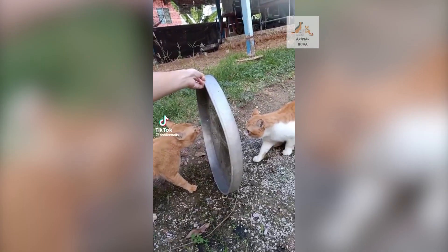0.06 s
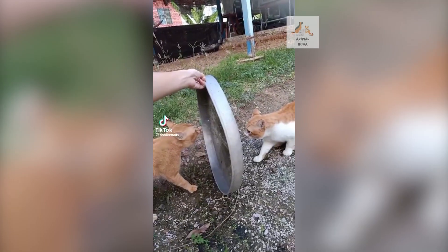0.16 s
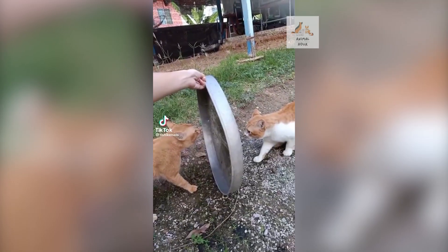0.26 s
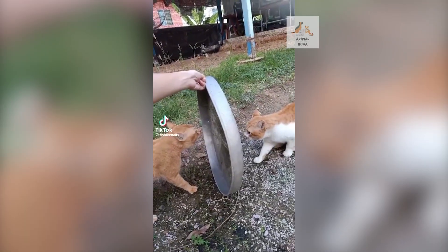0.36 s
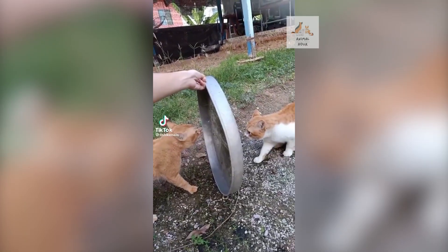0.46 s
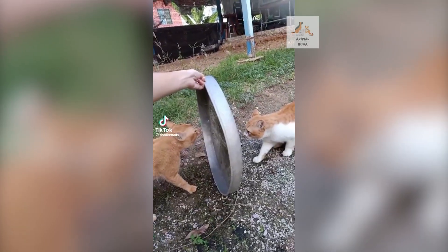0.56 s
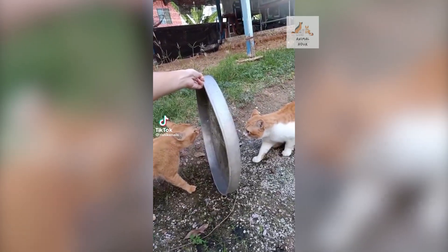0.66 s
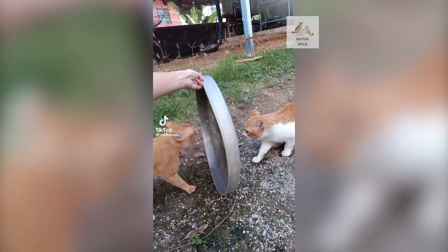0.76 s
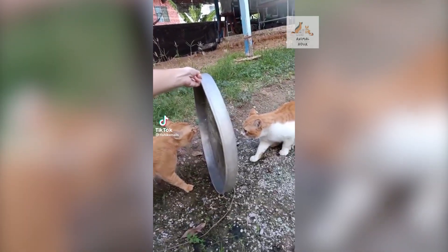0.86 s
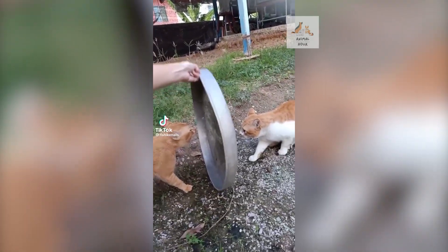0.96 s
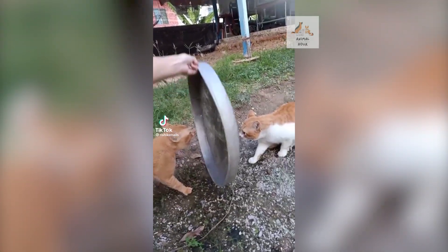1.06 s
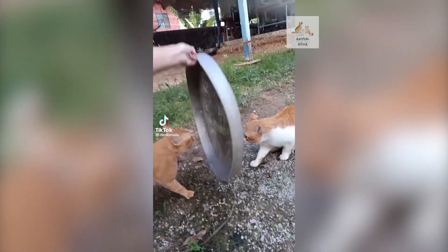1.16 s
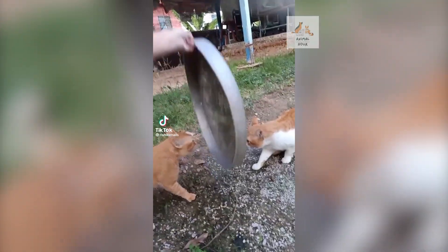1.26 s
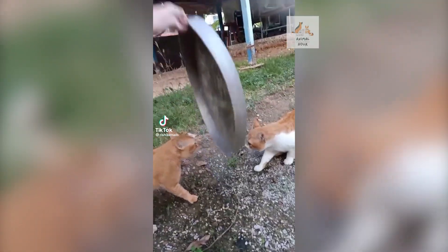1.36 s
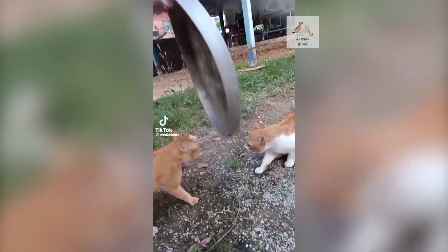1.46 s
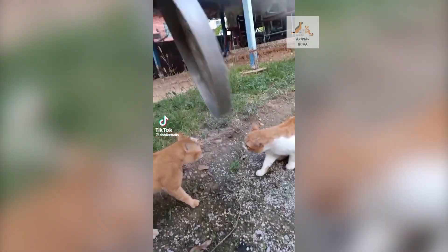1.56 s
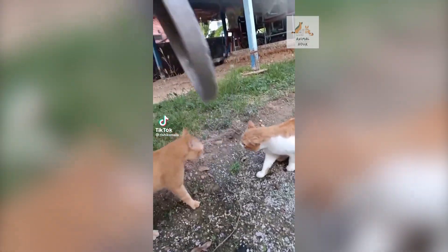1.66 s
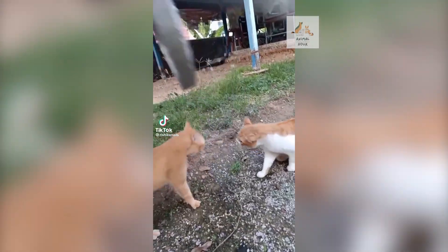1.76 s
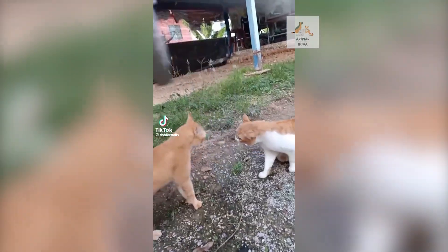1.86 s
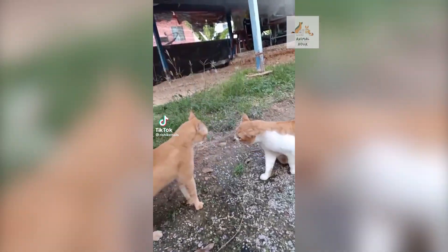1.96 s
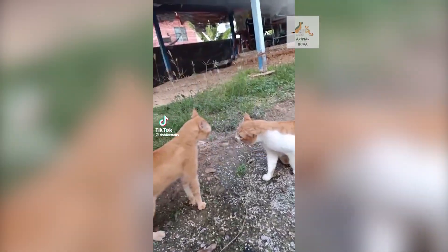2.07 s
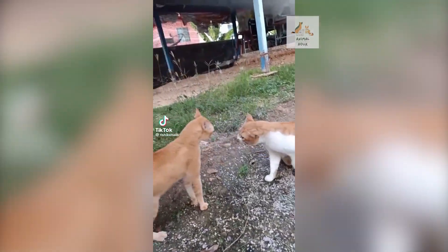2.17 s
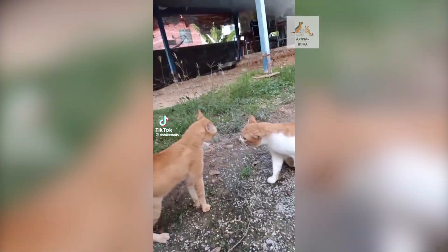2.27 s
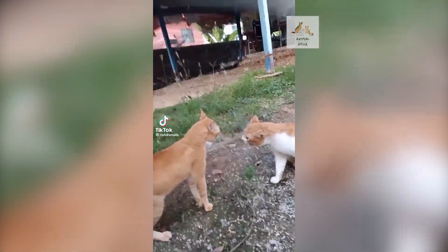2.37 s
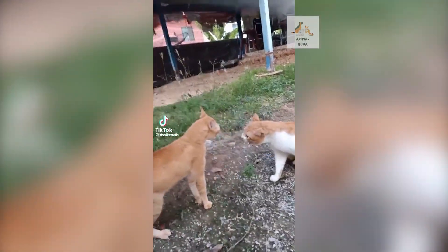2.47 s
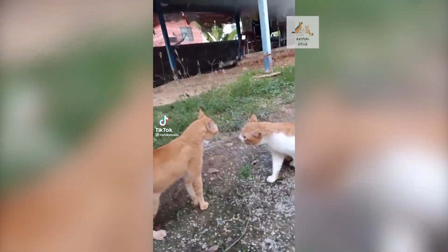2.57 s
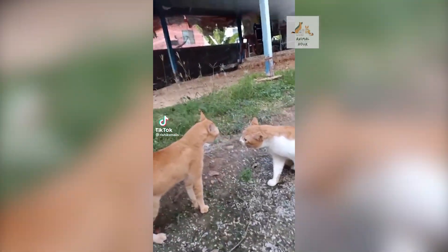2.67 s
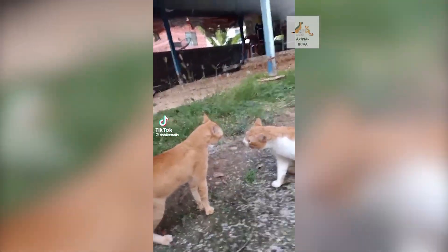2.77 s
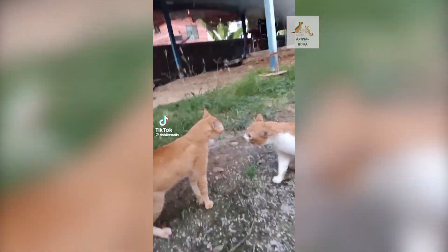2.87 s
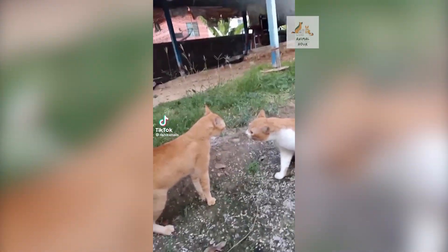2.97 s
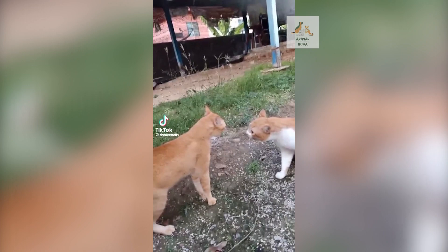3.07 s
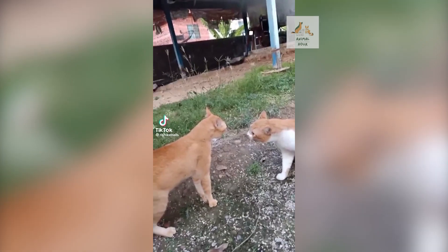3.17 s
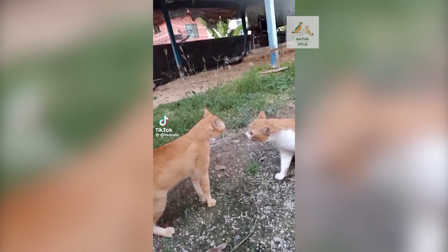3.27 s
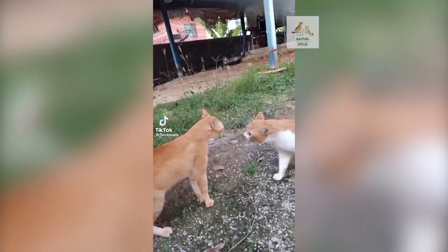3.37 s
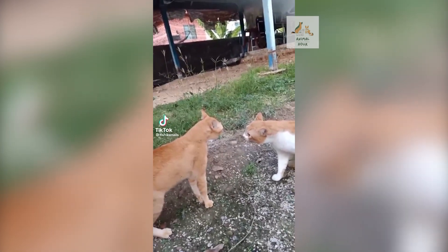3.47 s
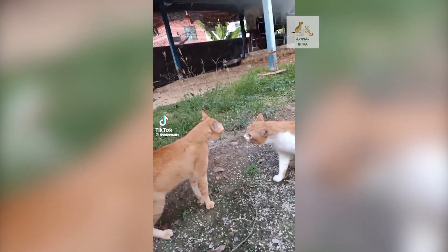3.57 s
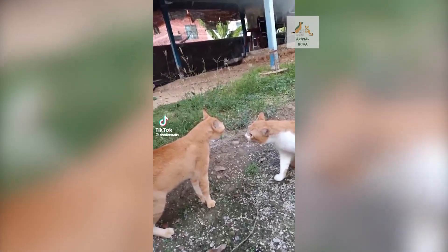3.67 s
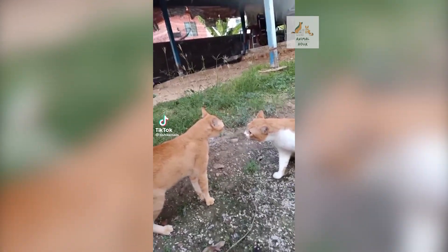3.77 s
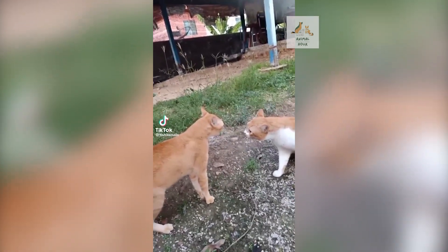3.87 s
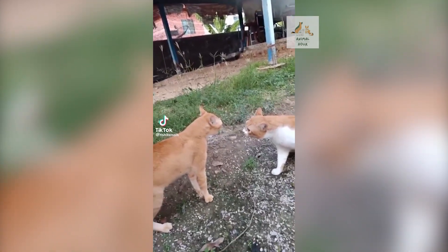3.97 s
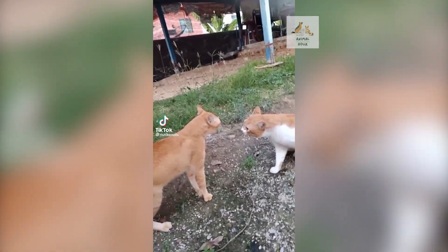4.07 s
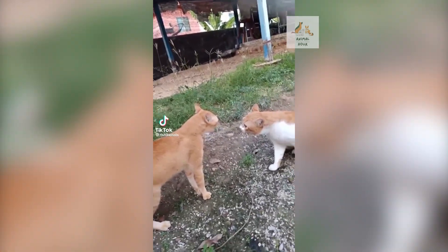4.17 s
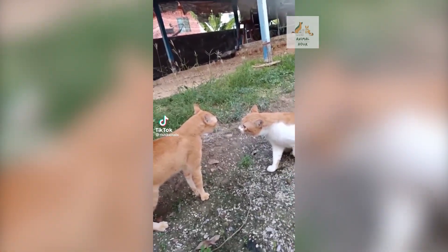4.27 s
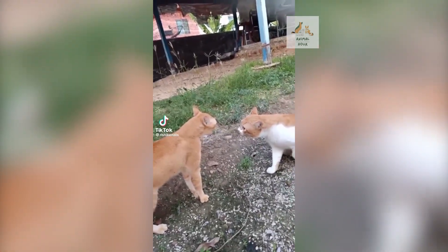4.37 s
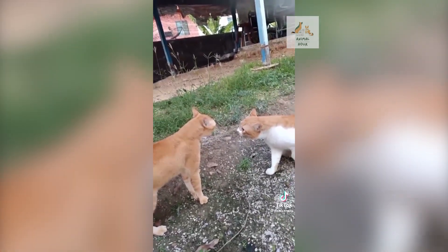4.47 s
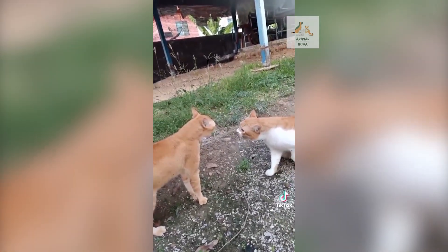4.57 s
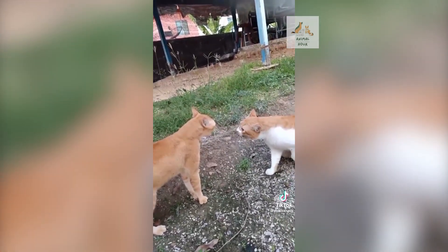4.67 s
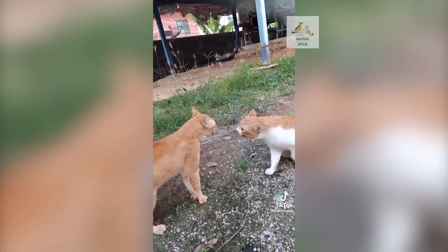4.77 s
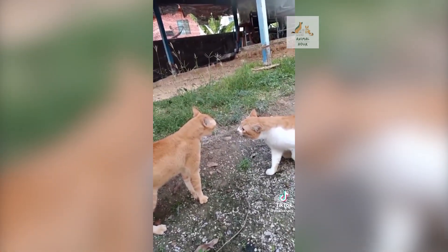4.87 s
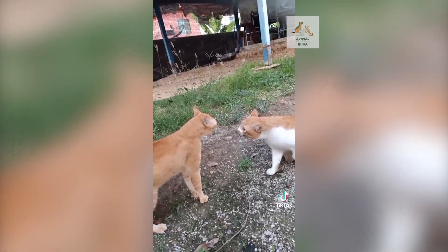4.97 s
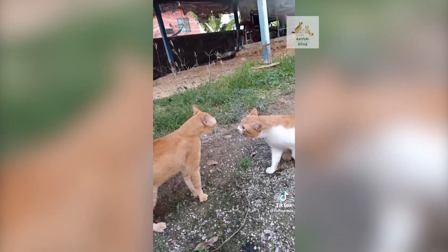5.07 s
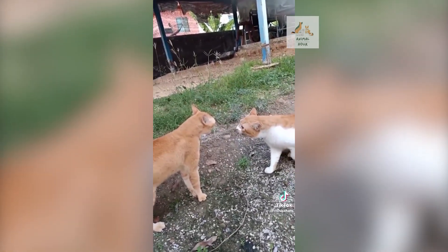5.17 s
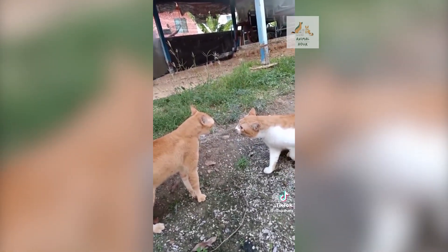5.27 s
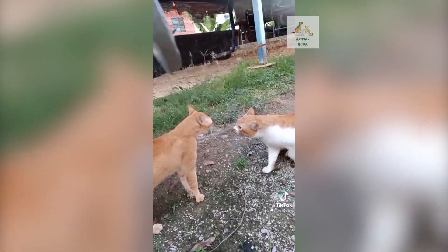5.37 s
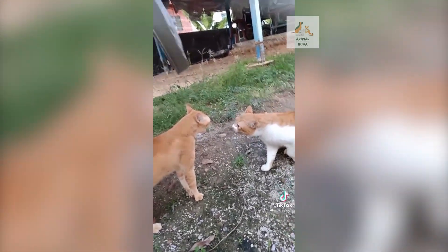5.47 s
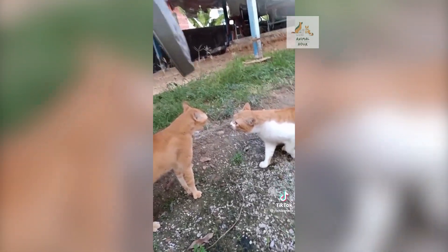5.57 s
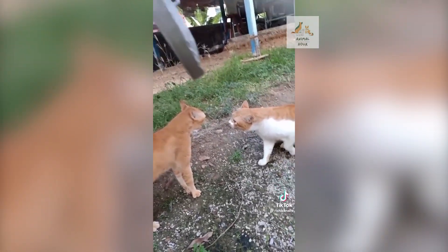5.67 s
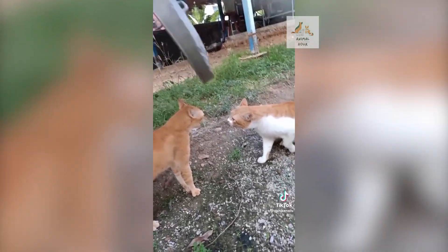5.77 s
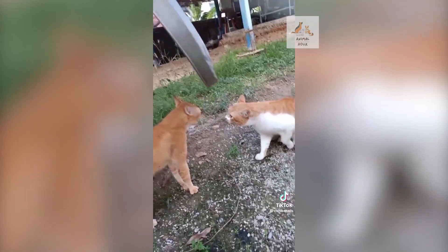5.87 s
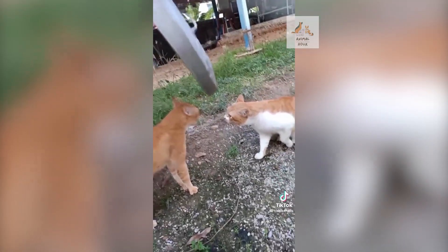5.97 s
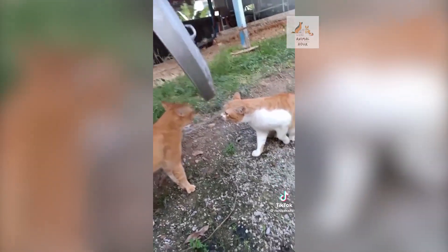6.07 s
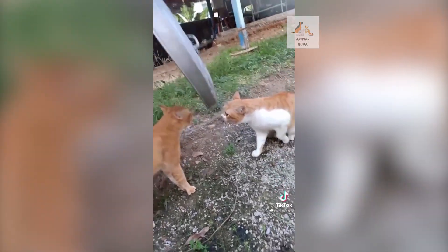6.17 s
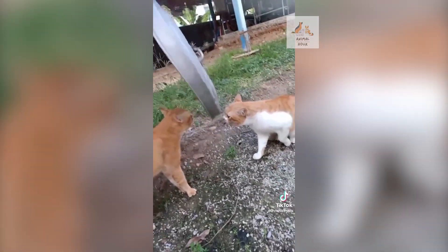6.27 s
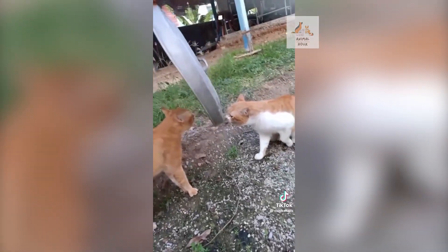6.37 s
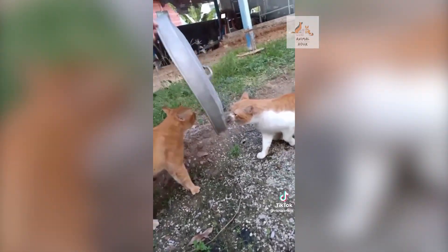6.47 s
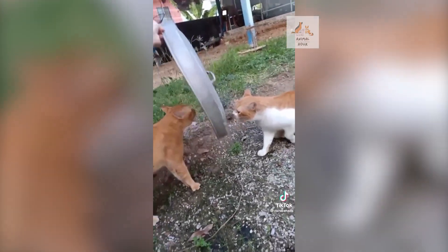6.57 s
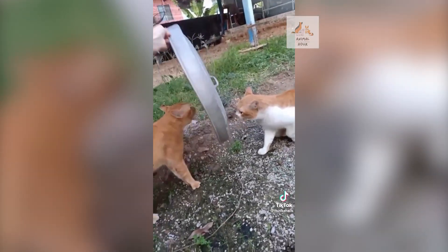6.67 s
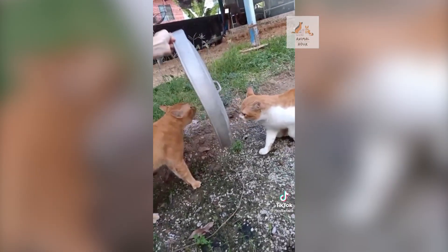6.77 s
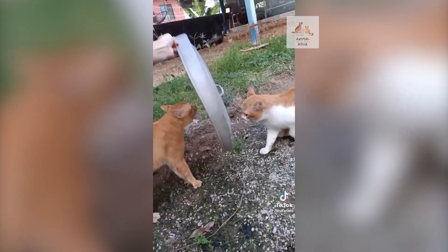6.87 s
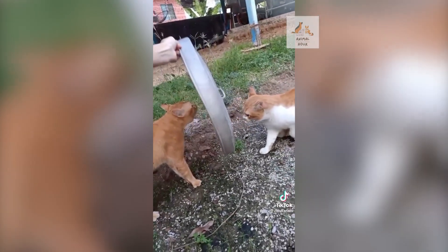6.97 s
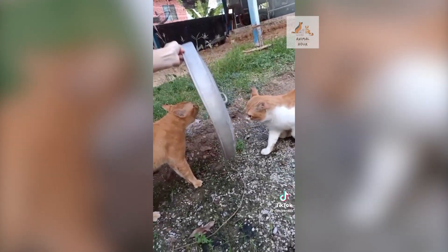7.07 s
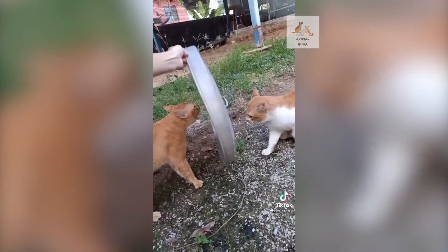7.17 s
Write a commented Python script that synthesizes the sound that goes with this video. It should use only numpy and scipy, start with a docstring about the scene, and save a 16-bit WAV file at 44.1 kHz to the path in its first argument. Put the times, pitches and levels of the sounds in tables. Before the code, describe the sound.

Close outdoor capture of two cats threatening each other. Quiet low moans lead to a sudden piercing scream about two seconds in, rough at its peak, then gliding down in pitch. The softer cat arches a moan beneath it. A second, cleaner yowl follows, held and wavering, closing down before a final short rise and fall. Sparse small knocks and scuffs sit over faint low outdoor noise and handling rumble, with short yard reflections.

```python
"""A loud cat moans, climbs to a harsh scream, then holds a long yowl that swells once more at the end.
A softer cat answers underneath with lower moans, the first with a little nasal hiss.
Each voice is a pulse train with breath noise, shaped by moving throat and mouth resonances.
Light ticks, knocks and scuffs are short noise bursts; the quiet outdoor bed and rumble are coloured noise.
Short echoes and scattered reflections place the cats and ticks in a yard, close to a wall."""
import sys
import numpy as np
from scipy import signal
from scipy.fft import rfft, irfft, next_fast_len
from scipy.io import wavfile

SR = 44100
rng = np.random.default_rng(int(sys.argv[2]) if len(sys.argv) > 2 else 0)


def store_wav(level_fs):
    """Save 16-bit WAV to argv[1]."""
    pcm = np.round(np.clip(np.atleast_2d(level_fs), -1, 1) * 32767)
    wavfile.write(sys.argv[1], SR, pcm.T.astype(np.int16))


N = 318843
TIME = np.arange(N) / SR
CUTOFF_HZ = 14500
STFT = dict(nperseg=1024, noverlap=896)

# Irregularity of the vocal folds (0-1): nearly clean in mid-call, creaky as a call starts and stops
STEADY_ROUGH, START_ROUGH = .012, 0.063
START_SETTLE_S, STOP_CREAK_S = .08, .04
# A cat presses harder while its pitch climbs, and the throat sags as a call runs out
PRESS_DB_PER_OCTAVE, FULL_PRESS_OCTAVES_PER_S, SAG_S = 0.98, 0.75, 0.31


def from_db(db):
    """Decibels to an amplitude factor."""
    return 10 ** (np.asarray(db) / 20)


def rms_one(x):
    """Scale a signal to an rms of 1."""
    return x / np.sqrt(np.mean(x ** 2) + 1e-20)


def band_pass(x, low_hz, high_hz):
    """Keep one band, its top edge held below the Nyquist limit."""
    band = [low_hz, min(high_hz, .45 * SR)]
    return signal.sosfilt(signal.butter(2, band, "band", fs=SR, output="sos"), x)


def glide(rows, t):
    """Each column of a curve at the times t, rounded into arcs that do not overshoot."""
    s, *columns = np.transpose(rows)
    k = np.clip(np.searchsorted(s, t) - 1, 0, len(s) - 2)
    step = np.maximum(np.diff(s), 1e-6)
    u = np.clip((t - s[k]) / step[k], 0, 1)
    out = []
    for c in columns:
        slope = np.diff(c) / step
        before, after = slope[:-1], slope[1:]
        # harmonic mean of neighbouring slopes, flat at peaks and dips
        inner = 2 * np.maximum(before * after, 0) / (before + after + 1e-12)
        turn = np.r_[slope[0], inner, slope[-1]]
        bend = (turn[k] - slope[k]) * (1 - u) - (turn[k + 1] - slope[k]) * u
        out.append(c[k] + step[k] * u * (slope[k] + (1 - u) * bend))
    return out


def swell(t, start, end, rise_s, fall_s):
    """Rises to 1 by the start, holds until the end, then falls."""
    return np.clip(1 + np.minimum((t - start) / rise_s, (end - t) / fall_s), 0, 1)


def at_pitch(posture, pitch):
    """The throat's shape at the given pitches, the same way going up and coming down."""
    at, *columns = np.transpose(posture)
    return [np.interp(pitch, at, c) for c in columns]


def colour(points, hz):
    """Gain of a short spectrum at the given frequencies."""
    at, db = np.transpose(points)
    return from_db(np.interp(np.log(hz + 1), np.log(at), db))


def resonance(hz, centre, width, lift_db):
    """Complex response of a resonance that lifts its own band and leaves the rest alone."""
    damping = 1j * hz * width
    return 1 + (from_db(lift_db) - 1) * damping / (centre ** 2 - hz ** 2 + damping)


def wander(rate_hz, spread, size):
    """Random wavering around a rate, mostly within a factor of 1 + spread; rms 1."""
    ratio = 1 + spread
    noise_in = rng.standard_normal(size + SR)
    return rms_one(band_pass(noise_in, rate_hz / ratio, rate_hz * ratio)[SR:])


def noise(points):
    """Steady noise of a given colour; rms 1."""
    size = next_fast_len(N)
    spectrum = rfft(rng.standard_normal(size), size)
    gain = colour(points, np.fft.rfftfreq(size, 1 / SR))
    return rms_one(irfft(spectrum * gain, size)[:N])


def roughness(t, strains, stop_rough):
    """The folds creak at both ends of a call and break up under strain."""
    start_creak = START_ROUGH * np.exp((t[0] - t) / START_SETTLE_S)
    stop_creak = stop_rough * np.exp((t - t[-1]) / STOP_CREAK_S)
    strain = sum(depth * swell(t, *timing) for *timing, depth in strains)
    return STEADY_ROUGH + start_creak + stop_creak + strain


def folds(pitch, rough, jitter, shimmer, rasp, air):
    """One pulse per cycle; under strain a slower flutter adds side tones and air rasps through."""
    size = len(pitch)
    flutter = rough * wander(168, .15, size)
    pitch = pitch * (1 + 0.0019 * wander(15, 0.71, size) + jitter * flutter)
    phase = 2 * np.pi * np.cumsum(pitch) / SR
    pulses = sum(np.cos(k * phase) * (k * pitch < CUTOFF_HZ) for k in np.arange(1, 41))
    pulses = pulses * (1 + shimmer * rough * wander(65, 2.1, size))
    # breath noise throbs with each cycle
    puffs = rng.standard_normal(size) * (1 + 0.32 * np.cos(phase)) * np.sqrt(SR / pitch) / 2
    return pulses + (air + rasp * rough) * puffs


def call(rows, posture, strains, voice, tract, jitter, shimmer, rasp, air, edge_s, sag_hz=0, stop_rough=.25):
    """The folds sound through three resonances and a notch; the mouth's rises as the jaw opens."""
    start, end = rows[0][0], rows[-1][0]
    inside = (TIME > start - edge_s) & (TIME < end + edge_s)
    t = TIME[inside]
    pitch, level_db, _ = glide(rows, t)
    source = folds(pitch, roughness(t, strains, stop_rough), jitter, shimmer, rasp, air)
    hz, frames, spectra = signal.stft(source, SR, **STFT)
    hz = hz[:, None] + 1
    frame_pitch, _, mouth = glide(rows, t[0] + frames)
    throat, upper, brightness, upper_db, notch_db = at_pitch(posture, frame_pitch)
    climb = np.gradient(np.log2(frame_pitch), frames)
    brightness = brightness + PRESS_DB_PER_OCTAVE * np.tanh(climb / FULL_PRESS_OCTAVES_PER_S)
    throat = throat - sag_hz * np.exp((frames - frames[-1]) / SAG_S)
    mouth_width, mouth_db, throat_width, throat_db, upper_width, notch_width = tract
    gain = colour(voice, hz) * from_db(brightness * np.log2(hz / frame_pitch))
    # little sounds below the fundamental
    gain = gain / (1 + (.7 * frame_pitch / hz) ** 8)
    gain = gain * resonance(hz, mouth, mouth_width, mouth_db)
    gain = gain * resonance(hz, throat, throat_width, throat_db)
    gain = gain * resonance(hz, upper, upper_width, upper_db)
    # a side cavity swallows the band between the throat's resonance and the upper one
    gain = gain / resonance(hz, np.sqrt(throat * upper), notch_width, notch_db)
    sound = signal.istft(spectra * gain, SR, **STFT)[1][:len(t)]
    # loudness follows the cat's effort, whichever harmonic a resonance favours
    window = np.hanning(1400)
    power = np.abs(signal.fftconvolve(sound ** 2, window / window.sum(), "same"))
    sound = sound / np.sqrt(power + 1e-12)
    gate = np.clip(np.minimum(t - start, end - t) / (2 * edge_s) + .5, 0, 1)
    out = np.zeros(N)
    out[inside] = sound * from_db(level_db) * gate
    return out


# The loud cat's opening call: (time [s], pitch [Hz], dry level [dB], mouth resonance [Hz])
OPENING_MOAN = [(0.0, 193.7, -54, 384), (.2, 198.3, -49.5, 400), (.45, 189.8, -51, 382),
                (.66, 180.8, -52.5, 373), (.75, 168, -55, 250)]
# Throat shape by pitch; a negative notch depth lifts that band: (pitch [Hz], throat resonance [Hz],
# upper resonance [Hz], brightness before pressing [dB/octave], upper lift [dB], notch depth [dB])
MOAN_POSTURE = [(190, 2080, 5500, -0.9, 25.5, 14.5)]
# Strain of the loud cat's folds, all calls:
# (hold start [s], hold end [s], rise [s], fall [s], added roughness [0-1])
YOWLER_ROUGH = [(1.55, 1.59, .02, 0.11, 0.1), (1.99, 2.484, 0.12, .3, 0.36), (1.98, 2.0, .03, 0.053, 0.14),
                (2.09, 2.22, 0.019, 0.12, 0.32), (5.72, 5.85, 0.077, 0.086, 0.04),
                (6.36, 6.44, .08, 0.12, .07)]
# Voice colour under the resonances: (frequency [Hz], relative level [dB])
MOAN_COLOUR = [(190.0, 4), (320.0, -12.5), (480.0, -15), (720.0, -13), (1100.0, -50), (1700.0, -30.5),
               (2600.0, -25), (3700.0, -15), (5000.0, -35), (6500.0, -30), (9000.0, -47), (13500.0, -56.0)]
# Fixed part of the tract: (mouth width [Hz], mouth lift [dB], throat width [Hz], throat lift [dB],
# upper width [Hz], notch width [Hz])
MOAN_TRACT = (76, 44, 290, 20.4, 130, 870)


def opening_moan():
    """Low closed-mouth moan: slow fold pulses through a low mouth resonance."""
    return call(OPENING_MOAN, MOAN_POSTURE, YOWLER_ROUGH, MOAN_COLOUR, MOAN_TRACT,
                jitter=.02, shimmer=0.2, rasp=0.08, air=0.031, edge_s=0.0021)


# Colour of the outdoor bed: (frequency [Hz], relative density [dB per Hz])
YARD_COLOUR = [(30, -23), (70, -4), (120, -2), (200, -4), (400, -3.5), (800, -5), (1500, -14.5),
               (2400, -10.5), (3500, -26.5), (5500, -18), (8000, -34.5), (14000, -38.5)]


def outdoor_bed():
    """Quiet, steady outdoor noise, weighted to the lows."""
    return from_db(-72) * noise(YARD_COLOUR)


# Swells of moving air and handling: (hold start [s], hold end [s], level before flutter [dB])
RUMBLE = [(0, 0.996, -69), (1.304, 2.06, -63), (4.603, 5.4, -72.5), (6.002, 7.1, -68)]
# Colour of the rumble: (frequency [Hz], relative density [dB per Hz])
RUMBLE_COLOUR = [(25, -30), (60, -11), (115, -4), (200, -9.5), (400, -9), (900, -18.5), (3000, -45)]


def rumble():
    """Moving air and handling heard as swells of low noise with a slow, random level flutter."""
    level = sum(from_db(db) * swell(TIME, start, end, rise_s=0.45, fall_s=0.28) for start, end, db in RUMBLE)
    flutter_db = 1 * wander(3.1, 1.2, N)  # 1 dB rms
    return level * from_db(flutter_db) * noise(RUMBLE_COLOUR)


# Light ticks, knocks and scuffs:
# (time [s], dry peak [dB], centre [Hz], bandwidth [Hz], 60 dB decay time [s])
TICKS = [(.106, -57, 4800, 2000, .006), (1.321, -59, 200, 200, 0.095), (1.9502, -29.5, 5000, 12000, 0.0016),
         (2.5075, -43.5, 5030, 12100, .002), (3.068, -43, 1447, 3000, 0.0076),
         (3.622, -49, 2505, 2505, 0.012), (4.1964, -49, 4450, 2190, 0.0049), (4.76, -55.5, 600, 200, .94),
         (5.22, -44, 950, 500, 0.63), (5.272, -44, 1900, 3500, 0.017), (5.77, -53, 600, 300, 0.85),
         (6.237, -43, 240, 202, 0.055), (6.247, -41, 1511, 3400, 0.013), (6.362, -56, 6040, 10000, .003)]


def ticks():
    """Each tick, knock or scuff is a dying noise burst in one band."""
    out = np.zeros(N)
    t = TIME[:SR // 2]
    for s, peak_db, hz, width, t60 in TICKS:
        high = width / 2 + np.hypot(width / 2, hz)  # the centre is the geometric mean of the edges
        burst = rng.standard_normal(len(t)) * (from_db(-60 * t / t60) + 1e-12)
        tick = band_pass(burst, high - width, high)
        place = out[int(s * SR):][:len(t)]
        place += from_db(peak_db) * tick[:len(place)] / np.abs(tick).max()
    return out


# The soft cat's first call: (time [s], pitch [Hz], dry level [dB], mouth resonance [Hz])
FIRST_ANSWER = [(.72, 203.4, -50, 593), (.78, 229, -57.5, 625), (.86, 303.3, -50.5, 570),
                (1.05, 338, -50, 666), (1.25, 321.6, -52, 592.5), (1.45, 291.5, -50.5, 578),
                (1.56, 254.7, -51, 565)]
# Shut-mouthed throat shape by pitch: (pitch [Hz], throat resonance [Hz], upper resonance [Hz],
# brightness before pressing [dB/octave], upper lift [dB], notch depth [dB])
SHUT_POSTURE = [(230, 1000, 4300, 0.66, 19, 29), (302, 1010, 3900, -0.34, 19, 16),
                (343, 1235, 4030, 0, 21.6, 12)]
# Strain of the soft cat's folds, all calls:
# (hold start [s], hold end [s], rise [s], fall [s], added roughness [0-1])
ANSWER_ROUGH = [(.74, .8, 0.048, .15, .15), (1.0, 1.06, 0.088, 0.095, .11), (2.1, 2.25, .3, .45, .2)]
# Colour of the shut-mouthed voice: (frequency [Hz], relative level [dB])
SHUT_COLOUR = [(190, -3), (320, -8.5), (480, -9.5), (720, -21), (1050, -12.5), (1350, -6.5), (1700, -15.5),
               (2600, -15), (3300, -30.5), (4100, -26), (4800, -40), (5800, -30), (9000, -64)]
# The soft cat's tract: (mouth width [Hz], mouth lift [dB], throat width [Hz], throat lift [dB],
# upper width [Hz], notch width [Hz])
ANSWER_TRACT = (87, 25.7, 24, 16.7, 44, 780)


def first_answer():
    """The airiest moan, mouth shut: much breath noise among the fold pulses."""
    return call(FIRST_ANSWER, SHUT_POSTURE, ANSWER_ROUGH, SHUT_COLOUR, ANSWER_TRACT,
                jitter=0.12, shimmer=0.37, rasp=0.41, air=0.074, edge_s=0.022)


# Colour of air hissing through the nose: (frequency [Hz], relative density [dB per Hz])
NOSE_HISS = [(900, -23), (1600, -4), (2500, -1), (3300, -16), (4600, -12), (5800, -15), (8000, -37),
             (14000, -48)]


def nose_hiss():
    """Air escapes through the nose at the top of the first answering moan."""
    return from_db(-71.5) * swell(TIME, start=0.89, end=1.06, rise_s=0.13, fall_s=0.43) * noise(NOSE_HISS)


# The scream: (time [s], pitch [Hz], dry level [dB], mouth resonance [Hz])
SCREAM = [(1.549, 247, -45, 570), (1.6, 348, -37, 981), (1.64, 457.4, -41, 1727), (1.67, 505, -34, 2260),
          (1.73, 551.7, -24, 2436), (1.79, 628.3, -16, 2454), (1.86, 711, -21, 2540),
          (1.96, 804.5, -12, 2424), (2.03, 839.2, -16.5, 2394), (2.12, 845, -19.5, 2170),
          (2.25, 805.5, -16, 2492), (2.389, 768, -15, 2300), (2.469, 720, -24.5, 2280),
          (2.58, 701.7, -28, 2255), (2.66, 651.3, -28.5, 2016), (2.756, 594, -30, 1942),
          (2.781, 511.4, -35, 1920), (2.98, 501.2, -35, 1853), (3.11, 472.6, -28.5, 1892),
          (3.22, 457.8, -28.5, 1804), (3.329, 442.5, -29, 1785), (3.5, 400.5, -37, 1483),
          (3.61, 385.4, -38, 1390), (3.73, 365.9, -34, 1427), (3.85, 357.5, -33.5, 1410),
          (3.97, 342, -32.5, 1352), (4.015, 310, -43, 1120)]
# Throat shape by pitch: (pitch [Hz], throat resonance before sag [Hz], upper resonance [Hz],
# brightness before pressing [dB/octave], upper lift [dB], notch depth [dB])
SCREAM_POSTURE = [(310, 2100, 5200, 0.5, 28, 16), (361, 2720, 5340, 0, 13, 1.5),
                  (416, 2920, 4650, 2.1, 16, 17.5), (480, 2760, 5250, 1.4, 4.3, -9.5),
                  (630, 2900, 5500, 1.5, 14, -6.5), (782, 3360, 5030, 1, 13.7, -0.5),
                  (804.5, 3400, 4600, 2.5, 17, -2.5), (840, 3350, 4840, 6, 24.8, -6)]
# Voice colour: (frequency [Hz], relative level [dB])
SCREAM_COLOUR = [(190.0, -0.5), (320.0, 5), (480.0, -4.5), (720.0, -12.5), (1100.0, 0), (1700.0, -8),
                 (2600.0, -6), (3700.0, -17.5), (5000.0, -25.5), (6500.0, -26.5), (9000.0, -42.5),
                 (13500.0, -48.5)]
# Tract: (mouth width [Hz], mouth lift [dB], throat width [Hz], throat lift [dB],
# upper width [Hz], notch width [Hz])
SCREAM_TRACT = (100, 40.6, 220, 12.8, 550, 1500)


def scream():
    """The jaw opens wide and the strained folds flutter and rasp at the peak before the pitch sinks."""
    return call(SCREAM, SCREAM_POSTURE, YOWLER_ROUGH, SCREAM_COLOUR, SCREAM_TRACT,
                jitter=0.072, shimmer=0.41, rasp=0.66, air=0.0072, edge_s=.008, sag_hz=149)


# The soft cat's later calls: (time [s], pitch [Hz], dry level [dB], mouth resonance [Hz])
RISING_ANSWER = [(1.56, 246, -49.5, 585), (1.7, 252, -57.5, 596), (1.87, 366, -53, 720),
                 (2.04, 454.6, -37.5, 1300), (2.17, 544, -34, 1406), (2.34, 609, -34.5, 1370),
                 (2.47, 544, -38, 1270), (2.505, 444, -33.5, 1300), (2.62, 385.3, -45.5, 1235),
                 (2.9, 283.2, -62, 850), (3.15, 209.6, -69, 515)]
LAST_ANSWER = [(4.099, 189.4, -67.5, 437), (4.2, 321.6, -57, 850), (4.34, 380.8, -41.5, 1100),
               (4.58, 371.8, -39.5, 1120), (4.77, 384.4, -37, 1150), (4.87, 370, -38.5, 1150),
               (4.97, 335.5, -46, 960), (5.12, 302.2, -56, 820), (5.27, 245.2, -58, 630),
               (5.5, 210.7, -55, 520), (5.95, 215, -56.5, 550), (6.08, 204.5, -53, 515),
               (6.2, 199.4, -56.5, 490)]
# Throat shape by pitch: (pitch [Hz], throat resonance [Hz], upper resonance [Hz],
# brightness before pressing [dB/octave], upper lift [dB], notch depth [dB])
ANSWER_POSTURE = [(227, 1300, 1100, 1.5, 2, 12.5), (297, 1900, 4300, -6.5, 15, -1.5),
                  (390, 1900, 4250, 0.95, 16, 7), (580, 1880, 3100, 4.5, 29, -7.5)]
# Voice colour: (frequency [Hz], relative level [dB])
ANSWER_COLOUR = [(190.0, 2), (320.0, -9.5), (480.0, -10.5), (720.0, -21), (1100.0, -9.5), (1700.0, -8),
                 (2600.0, -15.5), (3700.0, -30.5), (5000.0, -25), (6500.0, -37.5), (9000.0, -55),
                 (13500.0, -51)]


def later_answers():
    """Two soft moans, the mouth opening as pitch rises: one arches under the scream, one under the yowl."""
    rising = call(RISING_ANSWER, ANSWER_POSTURE, ANSWER_ROUGH, ANSWER_COLOUR, ANSWER_TRACT,
                  jitter=0.051, shimmer=0.37, rasp=0.35, air=0.05, edge_s=0.014)
    last = call(LAST_ANSWER, ANSWER_POSTURE, ANSWER_ROUGH, ANSWER_COLOUR, ANSWER_TRACT,
                jitter=0.07, shimmer=.5, rasp=.25, air=.02, edge_s=.012)
    return rising + last


# The long yowl: (time [s], pitch [Hz], dry level [dB], mouth resonance [Hz])
LONG_YOWL = [(4.52, 252, -50, 1048), (4.56, 318.2, -41.5, 1220), (4.6, 377.4, -39.5, 1700),
             (4.65, 422.6, -33.5, 1860), (4.73, 449, -24.5, 2130), (4.85, 479.5, -24, 2237),
             (4.99, 486.7, -25.5, 2273), (5.07, 480, -24.5, 2237), (5.16, 461, -25, 1977),
             (5.28, 456, -23, 1900), (5.4, 452.4, -26, 1903), (5.51, 440.2, -23.5, 1777),
             (5.65, 407.6, -31.5, 1373), (5.72, 396, -23, 1150), (5.79, 349.9, -40, 932),
             (5.89, 343.8, -35, 966), (5.98, 334, -38.5, 916), (6.07, 310.4, -42.5, 1040),
             (6.247, 304.5, -37.5, 1064)]
# Throat shape by pitch: (pitch [Hz], throat resonance [Hz], upper resonance [Hz],
# brightness before pressing [dB/octave], upper lift [dB], notch depth [dB])
YOWL_POSTURE = [(249, 2500, 4000, -2, 6, 8.5), (309, 2740, 3980, 2.2, 18, 7),
                (339, 2600, 4620, 2.4, 15.5, -1.5), (371, 2670, 4860, -2.1, 28.5, 8),
                (395.6, 2660, 5150, 0.2, 19.5, 8.5), (424, 2760, 5600, -.6, 14.5, 18.5),
                (458, 2580, 4950, -3, -5.5, -13.5), (487.3, 2757, 4970, -2.5, 13, -13.5)]
# Voice colour: (frequency [Hz], relative level [dB])
YOWL_COLOUR = [(190.0, 2), (320.0, 7.5), (480.0, -26), (720.0, -24.5), (1100.0, -8), (1700.0, -16),
               (2600.0, -21), (3700.0, -23), (5000.0, -24), (6500.0, -31), (9000.0, -37.5),
               (13500.0, -61.5)]
# Tract: (mouth width [Hz], mouth lift [dB], throat width [Hz], throat lift [dB],
# upper width [Hz], notch width [Hz])
YOWL_TRACT = (67, 57, 174, 23, 303, 710)


def long_yowl():
    """Cleaner pulses; a strong mouth resonance climbs as the jaw opens, then slides down as it closes."""
    return call(LONG_YOWL, YOWL_POSTURE, YOWLER_ROUGH, YOWL_COLOUR, YOWL_TRACT,
                jitter=0.017, shimmer=0.27, rasp=0.1, air=.008, edge_s=0.0091, stop_rough=.02)


# The yowl's last swell: (time [s], pitch [Hz], dry level [dB], mouth resonance [Hz])
LAST_YOWL = [(6.247, 302.5, -39.5, 1016), (6.285, 301.5, -38, 1077), (6.35, 343, -32.5, 1257),
             (6.42, 376.7, -24, 1471), (6.46, 406.3, -26, 1603), (6.52, 431.7, -20.5, 1765),
             (6.62, 444.2, -19.5, 1838), (6.7, 428.9, -22, 1788), (6.8, 387.5, -30.5, 1368),
             (6.87, 345, -39, 1174), (6.92, 284, -42.5, 918)]
# Throat shape by pitch: (pitch [Hz], throat resonance before sag [Hz], upper resonance [Hz],
# brightness before pressing [dB/octave], upper lift [dB], notch depth [dB])
LAST_POSTURE = [(317, 2770, 4160, 1, 18, 5.6), (346, 2800, 5200, 0.5, 9.1, 6.9),
                (395, 2760, 5650, -2.5, 16, 8), (440, 2717, 5700, -2, 17.2, 8.1)]
# Voice colour: (frequency [Hz], relative level [dB])
LAST_COLOUR = [(190, -1), (320, 3), (450, -15.5), (640, -12), (880, -26.5), (1200, -9.5), (1700, -16),
               (2300, -21.5), (3000, -20.5), (3700, -25), (5000, -22.5), (6500, -29), (9000, -43),
               (13500, -49.5)]


def last_yowl():
    """The yowl swells once more, and the throat's resonance sags far as it runs out."""
    return call(LAST_YOWL, LAST_POSTURE, YOWLER_ROUGH, LAST_COLOUR, YOWL_TRACT,
                jitter=0.03, shimmer=0.3, rasp=0.15, air=.009, edge_s=0.0065, sag_hz=542)


def scatter(t60_s, onset_s, low_hz, high_hz):
    """Many small reflections that build up and die away; energy 1."""
    t = TIME[:SR]
    response = rng.standard_normal(SR) * from_db(-60 * t / t60_s) * np.clip(t / onset_s, 0, 1)
    response = band_pass(response, low_hz, high_hz)
    return response / np.sqrt(np.sum(response ** 2))


# Reflections off ground and wall: (delay [s], level [dB])
ECHOES = [(.0023, -30.5), (.0094, -29.5), (.021, -24)]


def yard(x):
    """Ground and wall echo, gravel scatters the treble, the rest adds a faint tail with a ringing band."""
    echoes = sum(from_db(db) * np.interp(TIME - delay, TIME, x, left=0) for delay, db in ECHOES)
    gravel = from_db(-2) * scatter(t60_s=0.018, onset_s=0.0024, low_hz=3800, high_hz=14000)
    tail = from_db(-21.5) * scatter(t60_s=0.26, onset_s=0.0084, low_hz=150, high_hz=4200)
    ring = from_db(-28.5) * scatter(t60_s=0.28, onset_s=0.011, low_hz=2194, high_hz=2526)
    return x + echoes + signal.fftconvolve(x, gravel + tail + ring)[:N]


def scene():
    """Both cats and the ticks in the yard, over the outdoor bed and rumble."""
    loud_cat = opening_moan() + scream() + long_yowl() + last_yowl()
    soft_cat = first_answer() + nose_hiss() + later_answers()
    background = outdoor_bed() + rumble()
    return (yard(loud_cat + soft_cat + ticks()) + background)[None]


def record(dry):
    """A steep low-pass cuts the top."""
    return signal.sosfilt(signal.ellip(10, .1, 80, CUTOFF_HZ, fs=SR, output="sos"), dry)


dry = scene()
out = record(dry)
store_wav(out)
```